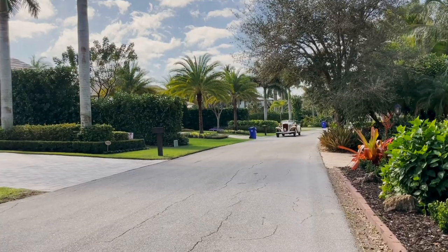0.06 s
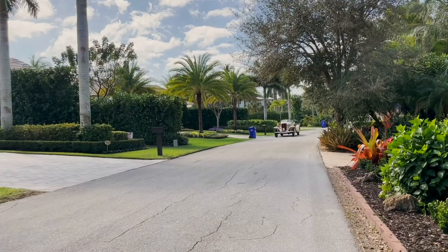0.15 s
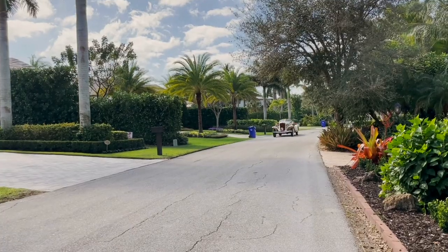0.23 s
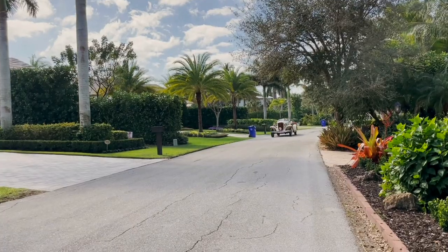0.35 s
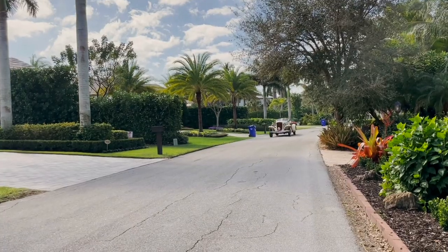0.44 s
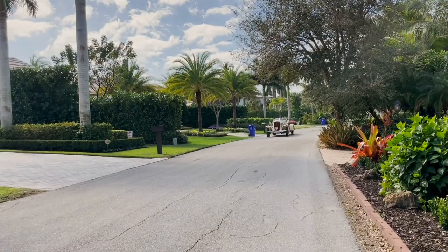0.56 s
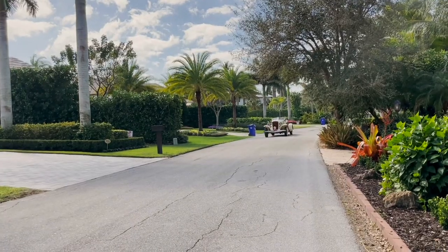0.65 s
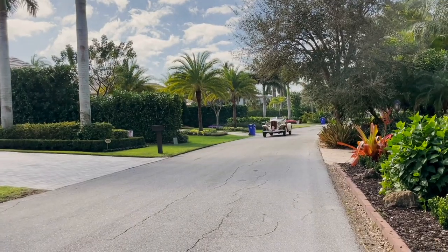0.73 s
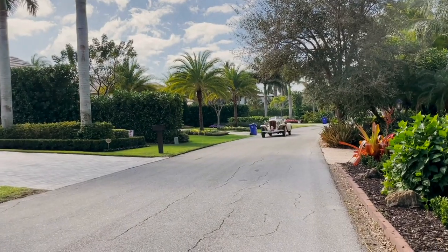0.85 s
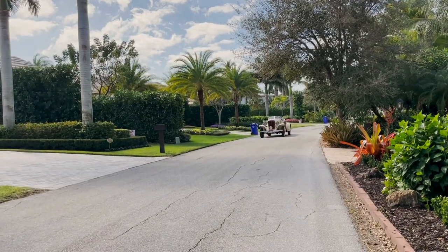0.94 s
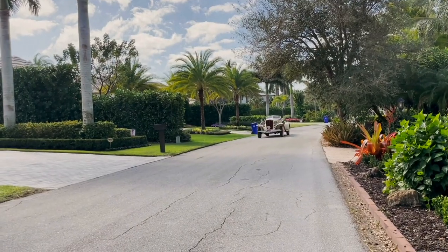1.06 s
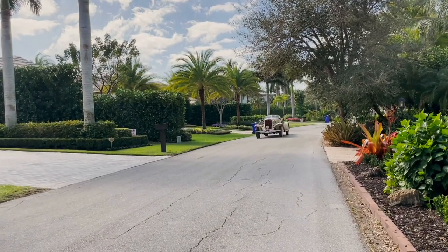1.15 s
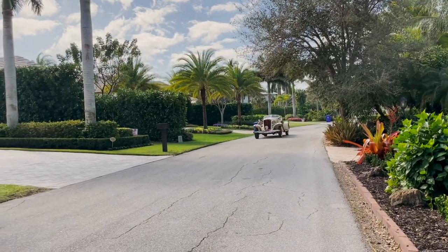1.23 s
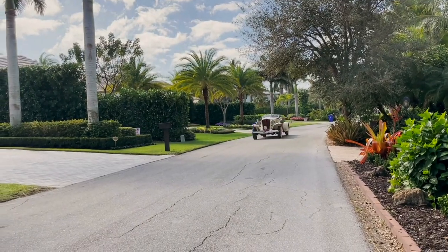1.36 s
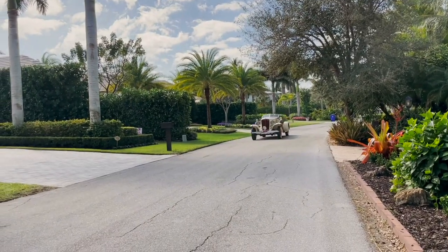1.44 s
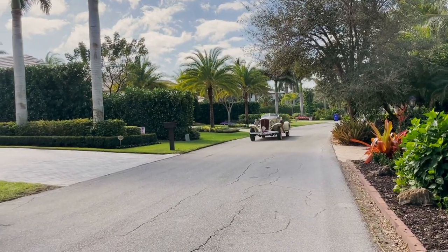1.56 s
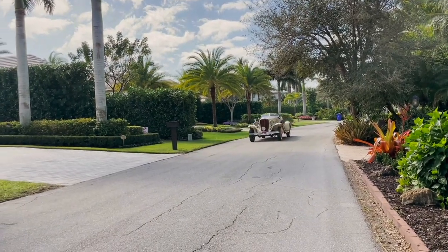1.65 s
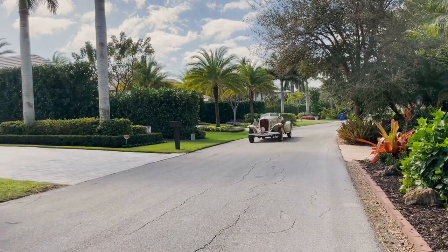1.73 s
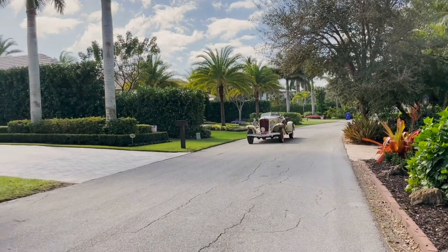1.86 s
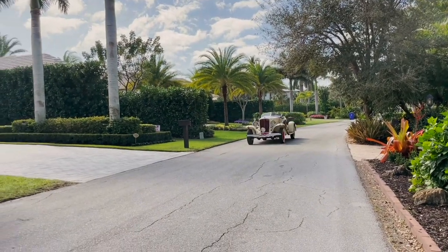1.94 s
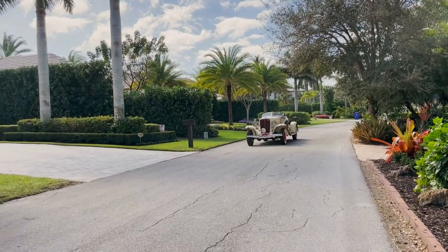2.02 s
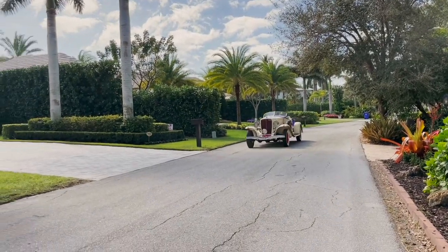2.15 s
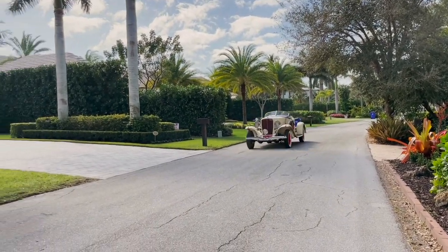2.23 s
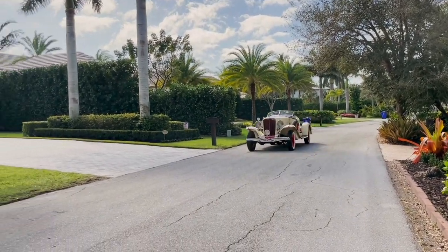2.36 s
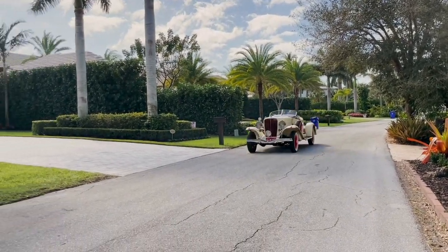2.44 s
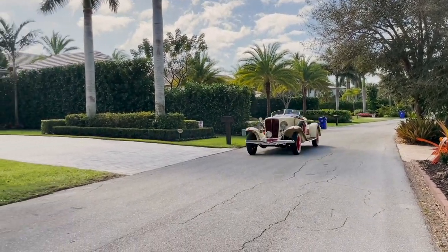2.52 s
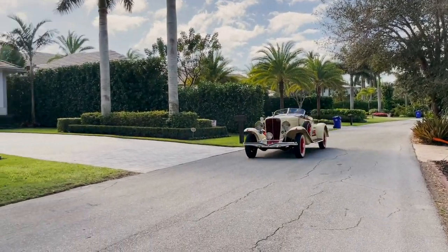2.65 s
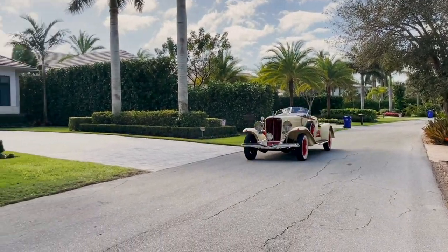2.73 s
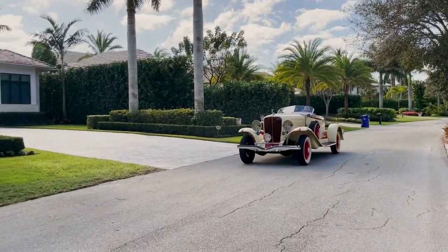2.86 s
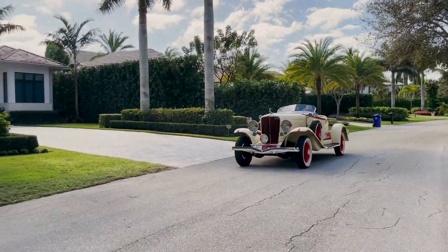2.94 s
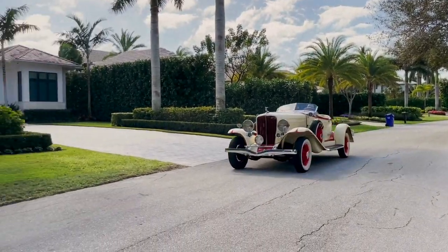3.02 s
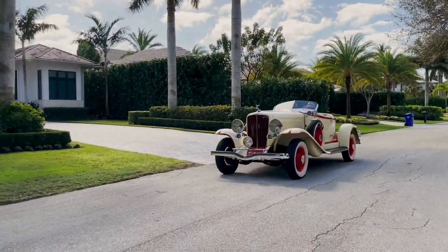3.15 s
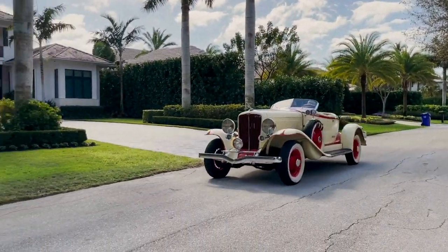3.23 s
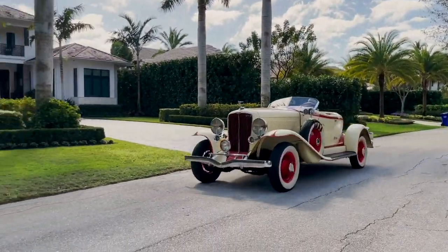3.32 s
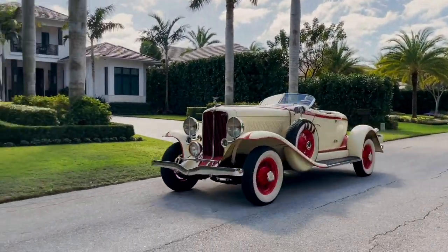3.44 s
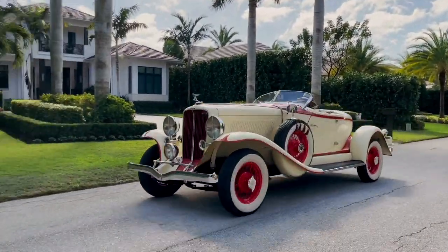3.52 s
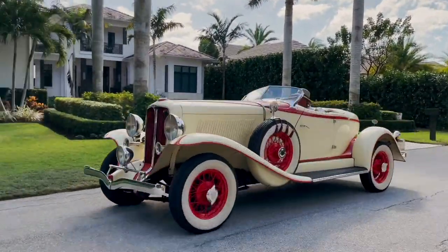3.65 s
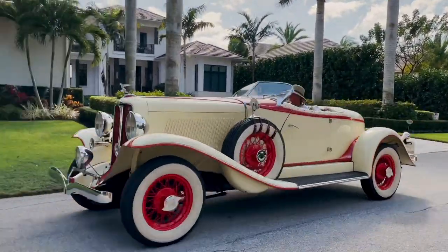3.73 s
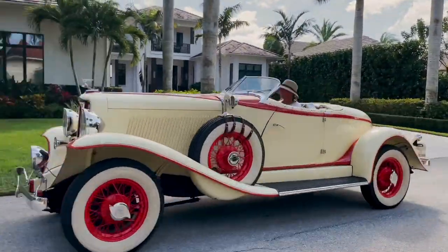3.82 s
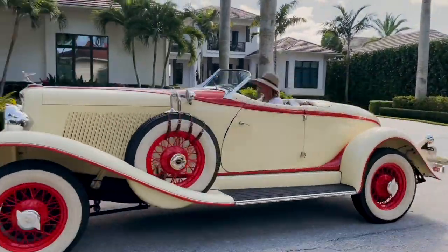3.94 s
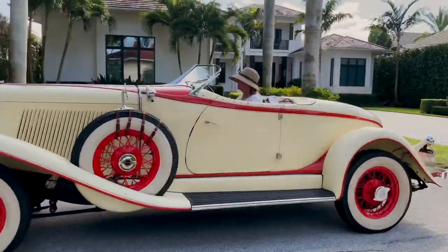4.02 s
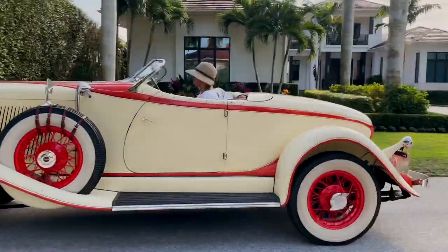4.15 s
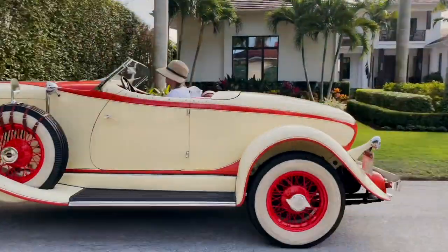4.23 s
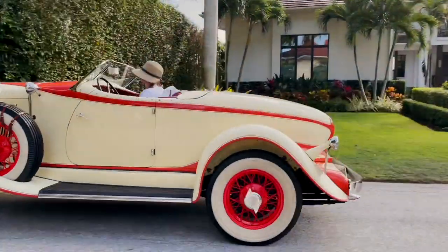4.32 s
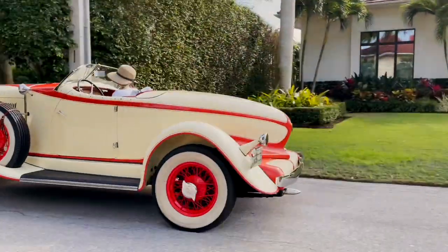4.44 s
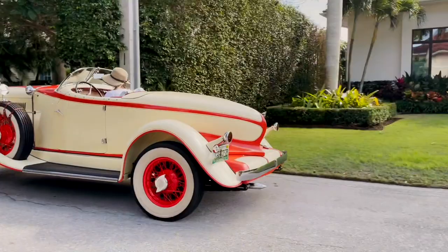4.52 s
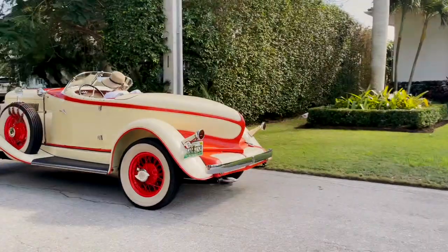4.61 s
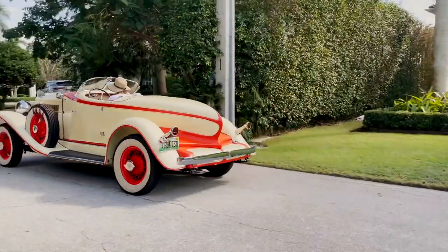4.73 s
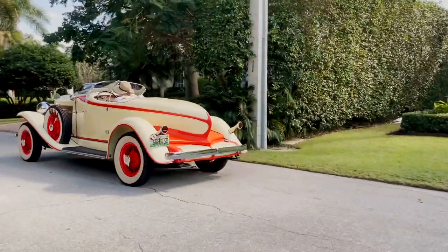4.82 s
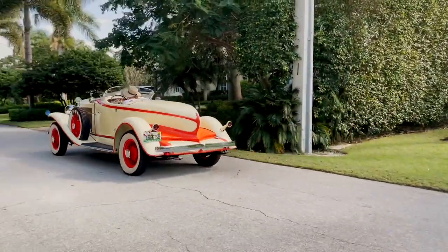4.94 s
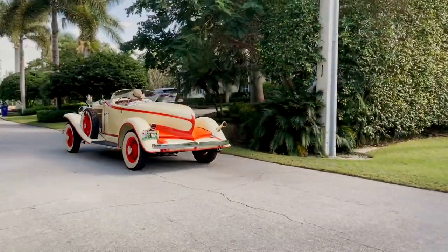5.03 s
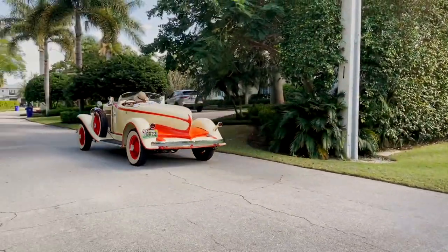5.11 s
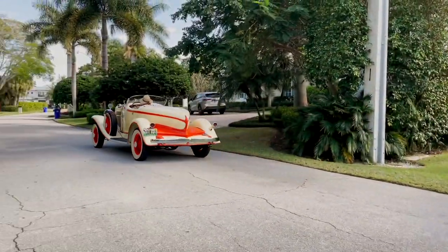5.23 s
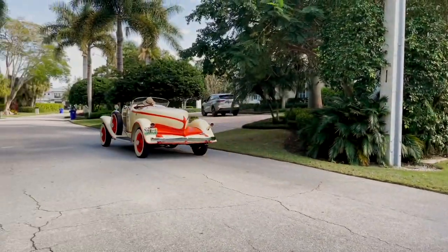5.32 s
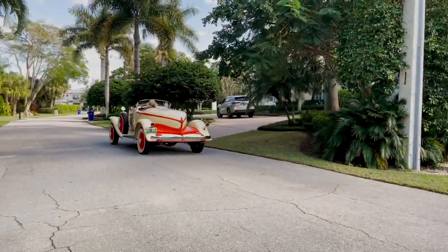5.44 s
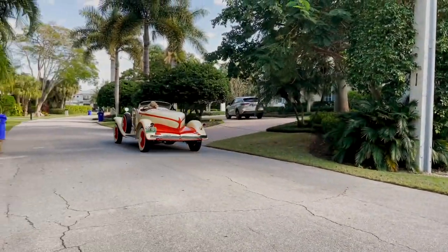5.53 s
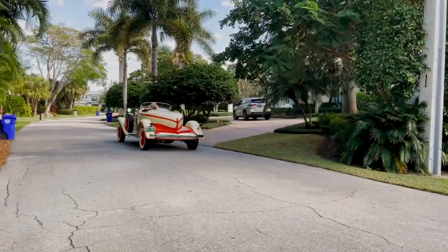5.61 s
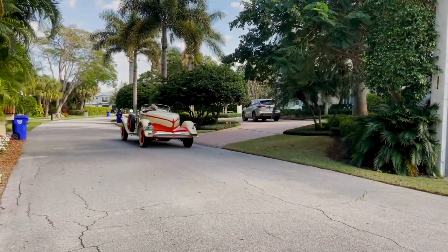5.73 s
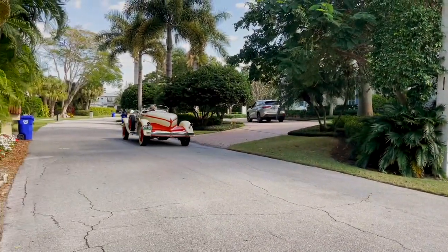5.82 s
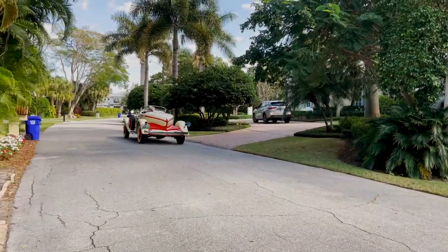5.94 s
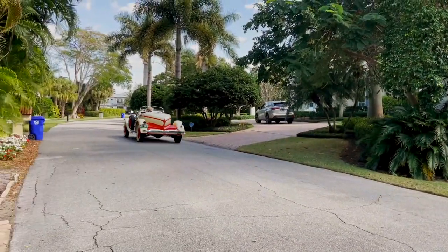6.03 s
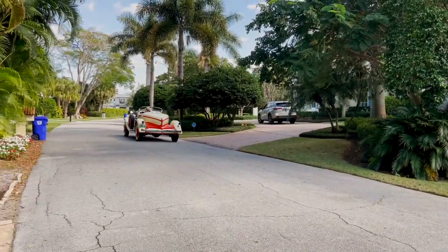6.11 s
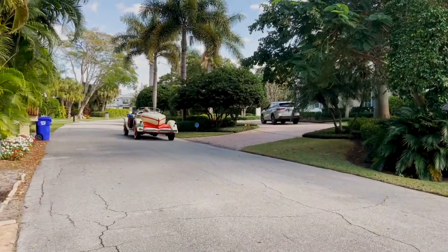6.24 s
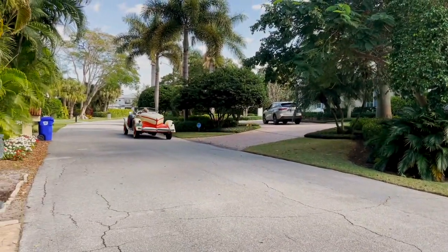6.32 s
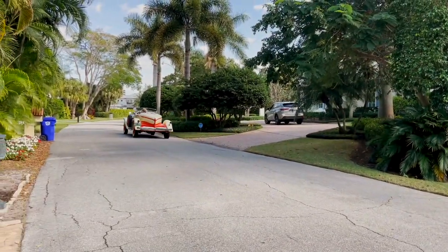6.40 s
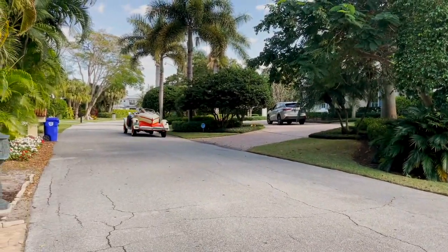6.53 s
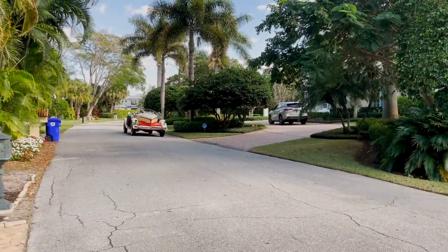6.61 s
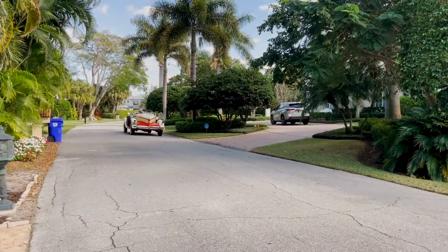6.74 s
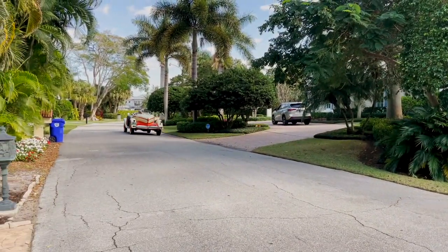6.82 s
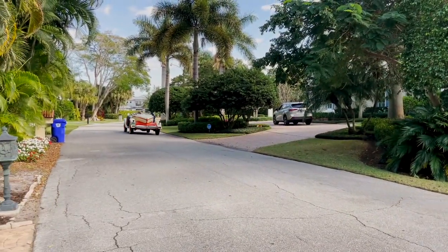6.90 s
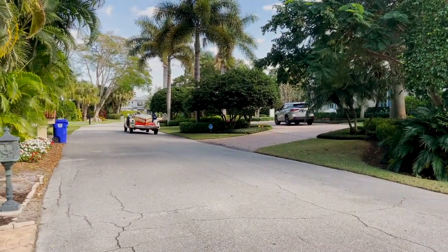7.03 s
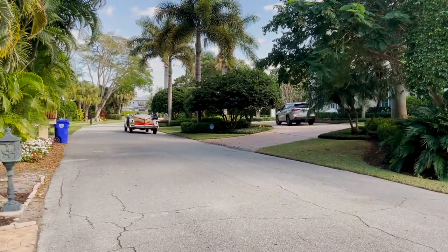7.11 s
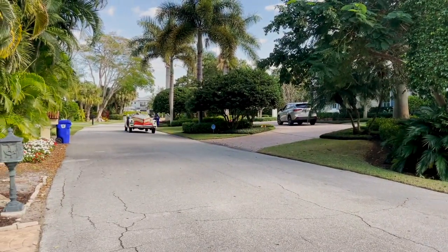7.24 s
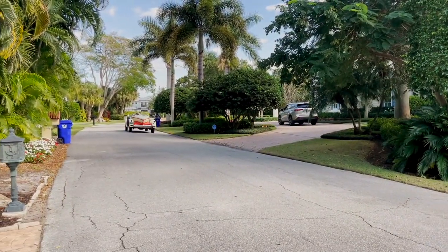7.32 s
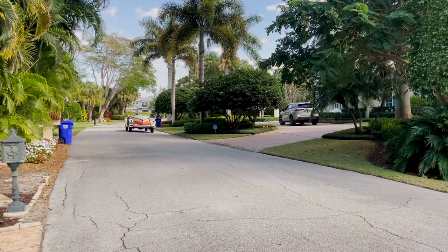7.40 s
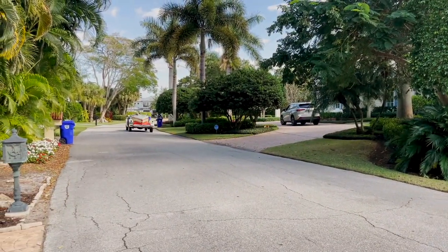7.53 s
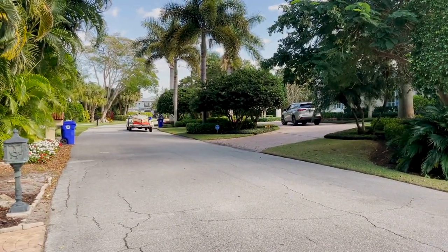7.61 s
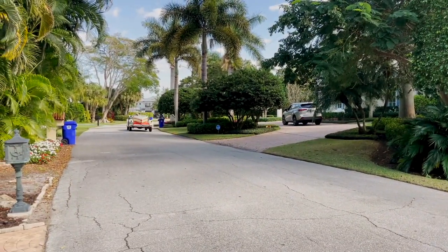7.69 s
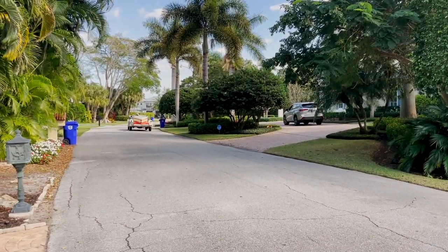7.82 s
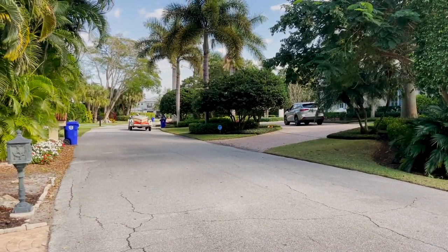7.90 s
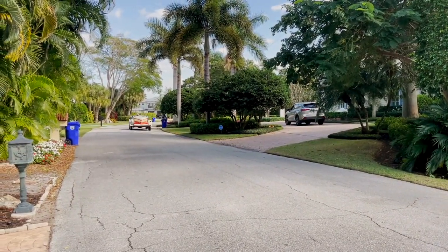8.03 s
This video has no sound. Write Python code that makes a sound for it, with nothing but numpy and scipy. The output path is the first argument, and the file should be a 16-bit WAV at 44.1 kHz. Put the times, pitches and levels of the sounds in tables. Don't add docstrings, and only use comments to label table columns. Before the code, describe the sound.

Handheld phone outdoors, stereo, beside a leafy road. Tyre wash and fan hiss grow gradually, joined by a brief gear whine and buffeting low wind bumps. As the old eight-cylinder car swings by, its tail reveals a steady deep hum of paired firings, fluttering gas puffs and dry metallic cracks. The drone wavers and dwindles into the distance under a slender axle note; a faint drawn-out bird call and another wind thump come near the end.

```python
import sys
import numpy as np
from scipy import signal
from scipy.io import wavfile
from scipy.ndimage import uniform_filter1d

SR = 44100
rng = np.random.default_rng(int(sys.argv[2]) if len(sys.argv) > 2 else 0)


def linear_from_db(decibels):
    return 10 ** (np.asarray(decibels, float) / 20)


def output_pcm(signal):
    pcm = np.clip(np.atleast_2d(signal).T, -1, 1) * 32767
    wavfile.write(sys.argv[1], SR, np.round(pcm).astype(np.int16))


N = 355578
T = np.arange(N) / SR

# time in seconds, level
# in dB.
RUMBLE_DB = [(0.0, -47), (0.07, -37), (0.11, -52), (0.2, -51), (0.24, -41), (0.31, -49), (0.56, -46),
             (0.59, -38), (0.72, -43), (0.76, -57), (0.89, -36), (0.93, -49), (1.03, -40), (1.09, -48),
             (1.13, -41), (1.29, -50), (1.56, -34.5), (1.69, -35), (1.76, -34), (2.02, -36), (2.17, -27.5),
             (2.23, -33), (2.45, -28), (2.51, -36.5), (2.59, -30), (2.65, -31), (2.74, -28), (2.9, -33),
             (3.32, -36), (3.55, -35.5), (3.59, -27), (3.7, -32.5), (3.76, -26), (4.4, -23.5),
             (4.55, -36), (5.2, -40), (5.8, -42), (6.4, -41), (7.0, -42), (7.6, -40), (8.06, -40)]
# frequency in Hz, density in dB per Hz.
RUMBLE_BREEZE_TONE = [(15, -33), (25, -41), (53, 3.5), (81, 2.5), (108, -0.5), (182, -5), (317, -11),
                      (362, -17.5), (450, -20), (580, -42), (990, -120)]
# frequency in Hz, density in dB per Hz.
RUMBLE_TAIL_TONE = [(15, -42), (25, -19), (49, -2.5), (102, 2), (231, -0.5), (321, -15.5), (362, -14),
                    (450, -19), (580, -46), (990, -120)]
# time in seconds, peak in
# dB, swing rate in Hz.
PORT_GUSTS = [(0.224, -30, 134), (0.581, -32, 83.4), (1.103, -32, 96), (1.788, -17, 155),
              (2.075, -18, 78.1), (2.157, -17, 99.6), (2.18, -27, 83.4), (2.293, -27, 118),
              (2.399, -32, 113), (2.56, -24, 67), (2.668, -16, 113), (2.735, -10.5, 72), (2.831, -20, 69.5),
              (3.578, -17, 59), (3.929, -21, 73), (4.068, -16, 59.2), (7.779, -31, 59.2),
              (7.999, -20.5, 97),
              (8.0483, -17, 88),
]
# time in seconds, fundamental in Hz, level in dB.
BIRD_CALL = [
    (7.12, 1460, -92),
    (7.14, 1410, -76),
    (7.17, 1370, -75),
    (7.22, 1280, -74),
    (7.28, 1245, -74),
    (7.36, 1225, -72),
    (7.46, 1250, -73),
    (7.6, 1265, -73),
    (7.66, 1240, -92),
]
BIRD_HARMONICS_DB = [-14, 1, 0, -2, -5, -10]
# time in seconds, peak in dB, pitch in Hz, width in Hz.
TICK_RINGS = [(2.780, -29, 4400, 3000), (2.7803, -23, 2300, 1200), (3.04, -50, 13000, 5000),
              (3.875, -45, 12000, 5900), (4.207, -22.5, 4200, 2500), (4.595, -21.5, 2050, 250),
              (4.652, -23, 1920, 300), (4.758, -14, 1830, 300), (4.831, -23, 1960, 150),
              (4.612, -29, 1750, 200), (4.721, -23, 2500, 250), (4.904, -21, 1900, 200),
              (4.96, -26, 1880, 200), (5.029, -34, 6400, 910), (5.049, -23, 5200, 2500),
              (5.268, -42, 6900, 500), (6.675, -49, 11000, 3000), (7.022, -48, 13900, 3000),
              (7.142, -52, 7000, 300), (7.158, -41, 10200, 2500), (7.505, -51, 14600, 2500)]
# time in seconds, pitch in Hz, level in dB, octave level in dB.
GEAR_WHIRR = [
    (0, 279, -70, -59),
    (.9, 290, -51, -45),
    (1.5, 313, -41.5, -40.5),
    (1.9, 326, -44, -54),
    (2.3, 335, -70, -80),
]
# time in seconds, side (0 nose, 1 flank, 2 tail).
CAR_FACING = [
    (0, 0.31),
    (1.7, 0.15),
    (2.5, 0.86),
    (3.2, 1.48),
    (4.1, 1.6),
    (4.6, 2.07),
    (5.3, 2.2),
    (6.0, 2.55),
    (8.06, 2.35),
]
# time in seconds, level in dB, airy top level in dB.
HISS_DB = [(0.0, -57, -66), (0.02, -51.5, -64.5), (0.27, -51.5, -68), (0.47, -52, -65), (0.96, -49, -62.5),
           (1.12, -49.5, -62.5), (1.55, -48, -60), (1.8, -45, -59), (2.36, -45.5, -64), (2.51, -45.5, -63),
           (2.6, -46.5, -68), (2.96, -46, -64.5), (3.01, -45.5, -70), (3.05, -45.5, -60), (3.12, -47, -68),
           (3.19, -46, -64), (3.25, -46, -66), (3.41, -45.5, -64), (3.55, -44.5, -65.5),
           (3.95, -43.5, -54.5), (3.97, -42, -57.5), (4.13, -42, -53), (4.22, -42, -54), (4.58, -42, -48.5),
           (4.83, -40.5, -54), (5.12, -44.5, -54.5), (5.5, -49.5, -62), (6.11, -54.5, -70),
           (6.42, -58.5, -76), (6.51, -60.5, -76.5), (7.09, -59.5, -77.5), (7.16, -59, -74),
           (7.21, -59.5, -78), (7.7, -60, -77.5), (8.04, -62.5, -83), (8.06, -63, -83)]
# frequency in Hz, density in dB per Hz.
AIR_TOP_TONE = [(6500, -35), (7600, -7.5), (9000, -0.5), (11000, 2.5), (14500, 4), (15700, 1),
                (16000, -61.5)]
# frequency in Hz, density in dB per Hz.
HISS_NOSE_TONE = [(1120, -36), (1900, -11), (2190, 3), (2430, -6.5), (3360, -12.5), (3780, -11.5),
                  (4170, -13), (4830, -12.5), (5470, -19.5), (5760, -24.5), (6790, -17), (7150, -16),
                  (7400, -31), (9620, -66), (16300, -120)]
# frequency in Hz, density in dB per Hz.
HISS_FLANK_TONE = [(1120, -29), (1900, -2.5), (2550, -3), (2910, -12.5), (4170, -19), (4970, -18),
                   (5660, -25), (6990, -17), (7400, -22), (9620, -60.5), (16300, -120)]
# frequency in Hz, density in dB per Hz.
HISS_TAIL_TONE = [(1120, -16.5), (1900, -10.5), (2060, -2.5), (2610, -3.5), (2910, -6.5), (3830, -9),
                  (4190, -18), (4590, -13.5), (5630, -19.5), (6600, -16.5), (7400, -19.5), (9620, -56),
                  (16300, -120)]
# time in seconds, level in dB.
ROAR_DB = [(0.0, -39.5), (1.62, -35), (2.53, -35.5), (3.7, -28.5), (3.75, -27), (3.81, -28.5), (4.2, -28),
           (4.22, -26.5), (4.24, -29), (4.62, -28), (4.65, -26.5), (4.78, -29.5), (4.8, -25), (4.83, -32),
           (4.94, -30.5), (5.93, -38), (6.73, -42), (8.06, -44.5)]
# frequency in Hz, density in dB per Hz.
ROAR_NOSE_TONE = [(88, -35), (150, -2), (178, -3), (317, -2), (385, -5.5), (588, -2.5), (699, -5.5),
                  (787, -16), (937, -7.5), (1130, -12.5), (1300, -18.5), (1560, -13), (2000, -20.5),
                  (2600, -45), (4400, -120)]
# frequency in Hz, density in dB per Hz.
ROAR_FLANK_TONE = [(160, -34), (280, 4), (317, -4.5), (389, -14), (466, -4.5), (607, 0), (709, -2.5),
                   (789, -3.5), (1260, -2.5), (1750, -10), (2000, -15), (2600, -36), (4400, -120)]
# frequency in Hz, density in dB per Hz.
ROAR_TAIL_TONE = [(180, -31), (300, -6.5), (381, -3), (402, -16.5), (436, -5.5), (643, -8), (803, -9.5),
                  (1100, -12), (1290, -12.5), (1420, -14), (2000, -22.5), (2600, -49), (4400, -120)]
# time in seconds, cycles per second (one cycle: two crank turns, eight firings).
ENGINE_CYCLES_HZ = [(3.4, 14.3), (4.0, 14.05), (4.35, 13.9), (4.65, 13.753), (4.95, 13.74), (5.25, 13.762),
                    (5.55, 13.861), (5.85, 13.95), (6.3, 13.97), (7.0, 13.9), (8.1, 13.84)]
# time in seconds, level at the eighth order in dB, fourth order relative to it in dB.
DRONE_DB = [(3.5, -56, -13), (3.9, -42, -4), (4.2, -36, -10), (4.35, -22.5, -18), (4.4, -24, -20),
            (4.5, -19.5, -11), (4.66, -18, -9.5), (5.44, -27, -5), (5.87, -27, -10), (6.01, -34.5, -4),
            (6.16, -31.5, -7), (6.33, -37, -0.5), (6.63, -41.5, -6), (6.76, -33.5, -6), (6.86, -45, 1),
            (6.94, -34.5, -12), (7.45, -46, -1), (7.53, -44, -1), (7.75, -63, 5), (7.86, -42.5, -13),
            (8.06, -45, 0)]
# multiple of the cycle rate, level in dB.
ENGINE_ORDERS_DB = [(1, -47), (2, -36), (3, -36), (4, -1), (5, -27), (6, -35), (7, -24), (8, 0.5), (9, -28),
                    (10, -15), (11, -22), (12, -8), (13, -10.5), (14, -20), (15, -10.5), (16, -26),
                    (17, -13), (18, -10.5), (19, -31.5), (20, -10), (21, -15.5), (22, -22), (23, -47),
                    (24, -24), (25, -35), (26, -38), (27, -28), (28, -20), (29, -50.5), (30, -51)]
CHUFF_STRENGTH_DB = [-1, -2.5, -.5, 2]
# time in seconds, low band in dB, second band in dB,
# third band in Hz, third band in dB, top band in dB.
TAILPIPE_RASP = [(4.1, -110, -110, 3440, -110, -110), (4.25, -72, -65, 3530, -62, -68),
                 (4.4, -51, -54, 3500, -51, -60), (4.55, -53, -74, 3650, -47.5, -52),
                 (4.61, -33, -60, 3600, -43.5, -57), (4.68, -32, -38, 3750, -37.5, -70),
                 (4.76, -30, -44, 4110, -40, -50), (4.84, -37.5, -43.5, 4540, -41.5, -61),
                 (4.92, -40, -35, 4740, -49.5, -50), (4.99, -45, -39, 3660, -45.5, -78),
                 (5.05, -61, -43, 3720, -45, -44.5), (5.13, -65, -45, 3600, -43, -52),
                 (5.25, -68, -51, 3690, -42.5, -56), (5.5, -70, -65, 3740, -51, -74),
                 (5.75, -68, -73, 3720, -60, -72), (6.3, -89, -83, 3660, -65.5, -91),
                 (6.6, -110, -110, 3640, -110, -110)]
# frequency in Hz, sum in dB, difference in dB, share of the difference that follows
PORT_PAIR = [(22, -18, -35.5, .3, .5), (47, -0.5, -14.5, 1, 0.3), (250, -2.5, -18, 0.59, 0.23),
             (700, -2.5, -12, 0.37, 0.49), (1400, -1.5, -10, 0.35, .4), (3000, -3, -8, 0.94, 0.18),
             (4970, 0.5, -6, 0.58, 0.16), (7000, -4.5, -3.5, .3, .25), (8180, -6.5, 0, 0.1, 0.33),
             (9100, -12.5, 5.5, .3, 0.27), (10050, -3.5, 1, .3, .25), (10860, -2.5, -12, .3, .25),
             (12000, -3.5, -14, .3, .25), (13000, -4.5, -23, .3, .25)]
# time in seconds, change of the port difference in dB, left lag in samples.
PHONE_AIM = [(0, 2.5, 1.5), (2.0, 0, 2), (2.5, -2, 0.5), (3.3, -3, 0), (3.6, 1, -1.5), (4.7, -0.5, -0.5),
             (5.2, 0, -2), (8.06, 2, -6)]


def evened(x):
    return x / np.sqrt(np.mean(x ** 2) + 1e-20)


def curves(rows, t):
    s, *columns = np.transpose(rows)
    return [np.interp(t, s, c) for c in columns]


def colour(points, hz):
    f, db = np.transpose(points)
    return evened(linear_from_db(np.interp(np.log(hz + 1), np.log(f), db, -120, -120)))


def seen(tones, hz, t):
    facing = np.clip(curves(CAR_FACING, t)[0], 0, 2)
    return sum(np.maximum(1 - abs(facing - k), 0) * colour(tone, hz) for k, tone in enumerate(tones))


def resonate(x, hz, width_hz):
    turn = np.exp(2j * np.pi * np.cumsum(hz * np.ones(x.shape[-1])) / SR)
    r = np.exp(-np.pi * width_hz / SR)
    return 2 * (turn * signal.lfilter([(1 - r) ** 2], [1, -2 * r, r * r], x / turn)).real


def noise(shape, patchy_db, size=1024):
    t = np.arange(4 * N // size + 5) * size / 4 / SR
    hz = np.fft.rfftfreq(size, 1 / SR)
    a, b, c, d, patches = rng.standard_normal((len(t), len(hz), 5)).T
    patches = uniform_filter1d(uniform_filter1d(patches, size=9, axis=0), size=9, axis=1)
    z = np.array([a + 1j * b, c + 1j * d]) * linear_from_db(patchy_db * evened(patches))
    flat = signal.istft(z, nperseg=size)[1].std() * np.sqrt(2)
    shaped = signal.istft(z * shape(hz[:, None], t), nperseg=size, noverlap=3 * size // 4)[1][:, :N]
    return shaped * np.sqrt(2) / flat * 2


def rumble():
    def shape(hz, t):
        tone = seen((RUMBLE_BREEZE_TONE, RUMBLE_BREEZE_TONE, RUMBLE_TAIL_TONE), hz, t)
        return linear_from_db(curves(RUMBLE_DB, t)[0]) * tone
    return noise(shape, patchy_db=2.5, size=2048)


def gusts():
    out = np.zeros(N)
    for s, db, hz in PORT_GUSTS:
        u = (T - s) * hz - .75
        out += linear_from_db(db) * np.exp(-(u / 0.63) ** 2) * np.cos(2 * np.pi * (u - 0.11 * u ** 2) - .3)
    return out


def bird():
    hz, db = curves(BIRD_CALL, T)
    flutter = 0.119 * uniform_filter1d(rng.standard_normal(N), size=300)
    turns = np.cumsum(hz * (1 + flutter)) / SR
    sings = (T > BIRD_CALL[0][0]) & (T < BIRD_CALL[-1][0])
    flicker_db = 3.0 * evened(uniform_filter1d(rng.standard_normal(N), size=900)) + 1.5
    stack = sum(linear_from_db(g) * np.sin(2 * np.pi * (k + 3) * turns) for k, g in enumerate(BIRD_HARMONICS_DB))
    return sings * linear_from_db(db + flicker_db) * stack


def ticks():
    out = np.zeros(N)
    for s, db, hz, width_hz in TICK_RINGS:
        u = np.maximum(T - s, 0)
        decay = np.pi * width_hz * u
        out += linear_from_db(db) * np.e * decay * np.exp(-decay) * np.sin(2 * np.pi * hz * u)
    return out


def whirr():
    hz, db, octave_db = curves(GEAR_WHIRR, T)
    grain = rng.standard_normal((2, N))
    axle_db = np.interp(T, (5.0, 5.6, 7.0, 8.0), (-75, -48, -55.5, -59))
    axle = linear_from_db(axle_db) * evened(resonate(grain, 1300, width_hz=40))
    note = linear_from_db(db) * evened(resonate(grain, hz, width_hz=12.0))
    octave = linear_from_db(octave_db) * evened(resonate(grain, 1.97 * hz, width_hz=35))
    return axle + note + octave


def fan():
    def shape(hz, t):
        db, air_db = curves(HISS_DB, t)
        body = linear_from_db(db) * seen((HISS_NOSE_TONE, HISS_FLANK_TONE, HISS_TAIL_TONE), hz, t)
        return body + linear_from_db(air_db + 2.0) * colour(AIR_TOP_TONE, hz)
    return noise(shape, patchy_db=1.5, size=512)


def tyres():
    def shape(hz, t):
        return linear_from_db(curves(ROAR_DB, t)[0]) * seen((ROAR_NOSE_TONE, ROAR_FLANK_TONE, ROAR_TAIL_TONE), hz, t)
    return noise(shape, patchy_db=1.0)


def road_echo(x):
    metres = np.hypot(3.2, 5.47 * (T - 4.1))
    late_s = T - 1.313 / metres / 343
    echo = np.array([np.interp(late_s, T, v) for v in x])
    return (x + 0.098 * echo) / 1.105


def scattered(x):
    taps = rng.standard_normal(1500) * np.exp(-np.arange(1500) / 350)
    return signal.oaconvolve(x, taps / np.linalg.norm(taps))[:N]


def cycle():
    turns = np.cumsum(curves(ENGINE_CYCLES_HZ, T)[0]) / SR
    return turns - np.interp(4.757, T, turns) + .857


def drone():
    turns = cycle()
    out = np.zeros(N)
    level_db, fourth_db = curves(DRONE_DB, T)
    upper_db = uniform_filter1d(level_db, size=20000) + 1.2 * np.maximum(T - 5.7, 0)
    knots_s = np.linspace(0, T[-1], num=40)
    for k, db in ENGINE_ORDERS_DB:
        k = round(k)
        if k in (4, 8, 12):
            lag = -.04 * (k - 8) - .0056 * (k - 8) * k
        else:
            lag = -.21 + .485 * (k - 16) - .024 * (k - 16) ** 2
        if k == 4:
            own_db = level_db + fourth_db + 3.5
        else:
            own_db = db + (upper_db if k > 8 else level_db)
        waver_db = 1.8 * (k > 8) * np.interp(T, knots_s, rng.standard_normal(len(knots_s)))
        out += linear_from_db(own_db + waver_db) * np.cos(2 * np.pi * (k * turns + lag))
    return np.sqrt(2) * out


def chuffs():
    beats = 4 * cycle() - .33
    count = np.floor(beats).astype(int)
    since_s = (beats - count) / 55.3
    puff = evened((1 - np.exp(-since_s / .002)) ** 2 * np.exp(-since_s / .0034))
    puff = puff * linear_from_db(np.array(CHUFF_STRENGTH_DB))[count % 4]
    index = count - count.min()
    each = (index.max() + 1, 4)
    bends = 1 + .06 * rng.standard_normal(each)[index].T
    strengths = linear_from_db(2.1 * rng.standard_normal(each))[index].T
    low_db, second_db, third_hz, third_db, top_db = curves(TAILPIPE_RASP, T)
    bands = ((1830, 330, low_db), (2520, 300, second_db), (third_hz, 600, third_db), (6700, 900, top_db))
    out = np.zeros((2, N))
    for strength, bend, (hz, width_hz, db) in zip(strengths, bends, bands):
        jet = evened(resonate(rng.standard_normal((2, N)), hz * bend, width_hz))
        steady = jet / np.sqrt(uniform_filter1d(jet ** 2, size=260, axis=1) + .15)
        out += linear_from_db(db + 1.0) * evened(strength * puff * steady)
    return out


def scene():
    points = gusts() + bird() + ticks() + drone()
    direct, spread = (rumble() + whirr() + road_echo(fan() + tyres()) + chuffs()
                      + np.array([points, scattered(points)]))
    return np.array([direct + spread, direct - spread])


def weaker_muted(mid, side, hz):
    hz = hz[:, None]
    starts = np.arange(0, len(hz), 32)
    band = np.arange(len(hz)) // 32
    mid_db, side_db = (10 * np.log10(np.add.reduceat(abs(z) ** 2, starts) + 1e-20) for z in (mid, side))
    jitter_db = 3.2 * uniform_filter1d(rng.standard_normal(mid_db.shape), size=3, axis=1)
    excess_db = (mid_db - side_db + jitter_db)[band]
    loud_db = 0.15 * (mid_db[14:20].mean(axis=0) + 84.5)
    mid = mid * (excess_db + loud_db > -5.5)
    mid = mid * ((abs(mid) > linear_from_db(mid_db[band] - 19.5)) | (hz < 5500))
    side = side * ((excess_db < 10.5) | (hz < 2000))
    return mid, side


def low_pass(x):
    return signal.sosfilt(signal.butter(12, 16370, fs=SR, output="sos"), x)


def record(dry):
    lead, frame = 83, dict(window="cosine", nperseg=2048, noverlap=1024)
    hz, t, (left, right) = signal.stft(np.pad(dry, ((0, 0), (lead, 0))), SR, **frame)
    direct, spread = (left + right) / 2, (left - right) / 2
    f, *columns = np.transpose(PORT_PAIR)
    sum_db, diff_db, share, lag = (np.interp(np.log(hz + 1), np.log(f), c)[:, None] for c in columns)
    aim_db, late = curves(PHONE_AIM, t)
    mid = linear_from_db(sum_db) * direct
    following = share * np.exp(2j * np.pi * lag) * direct
    side_gain = linear_from_db(diff_db + aim_db * np.clip(hz[:, None] / 2500, 0, 1))
    side = side_gain * (following + np.sqrt(1 - share ** 2) * spread)
    side = side - 1j * np.sin(np.pi * hz[:, None] * late / SR) * mid * (hz[:, None] < 3000)
    mid, side = weaker_muted(mid, side, hz)
    ports = signal.istft(np.array([mid + side, mid - side]), SR, **frame)[1][:, lead:lead + N]
    return low_pass(ports)


dry = scene()
out = record(dry)
output_pcm(out)
```